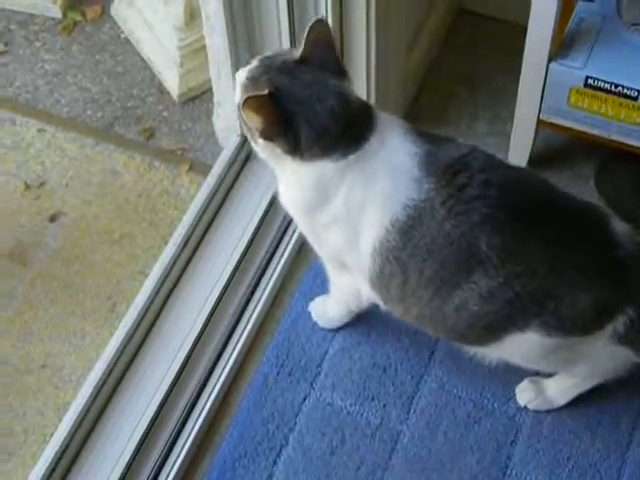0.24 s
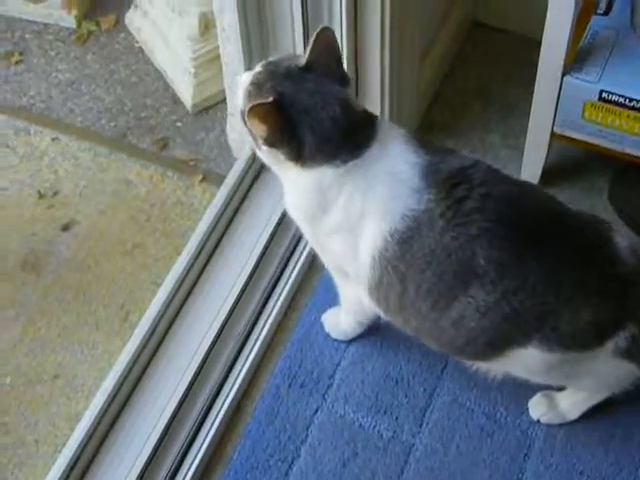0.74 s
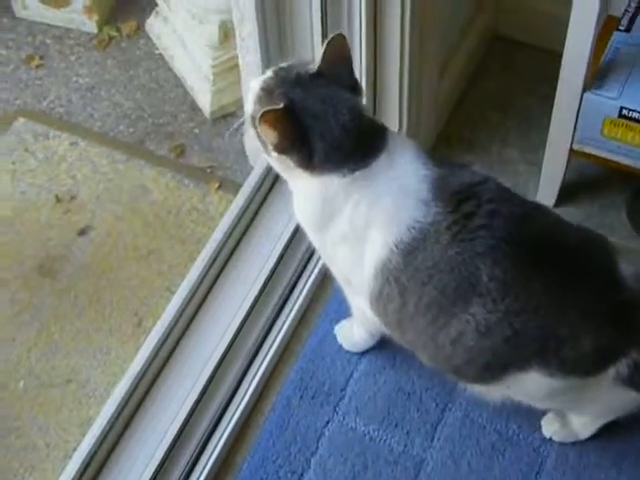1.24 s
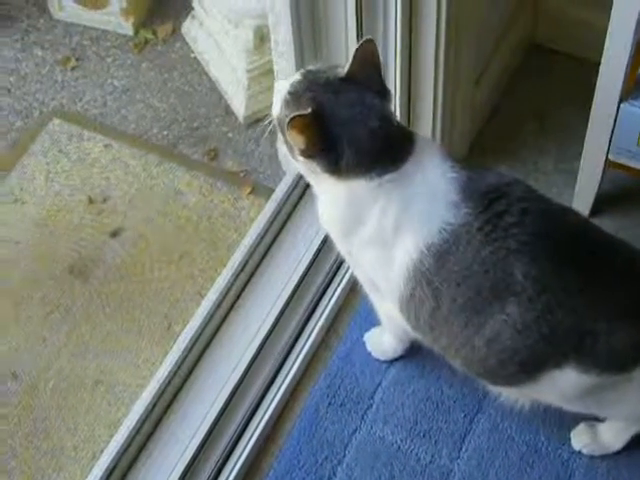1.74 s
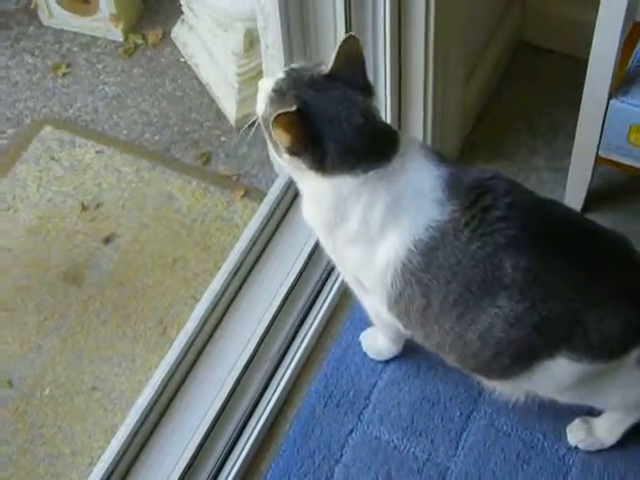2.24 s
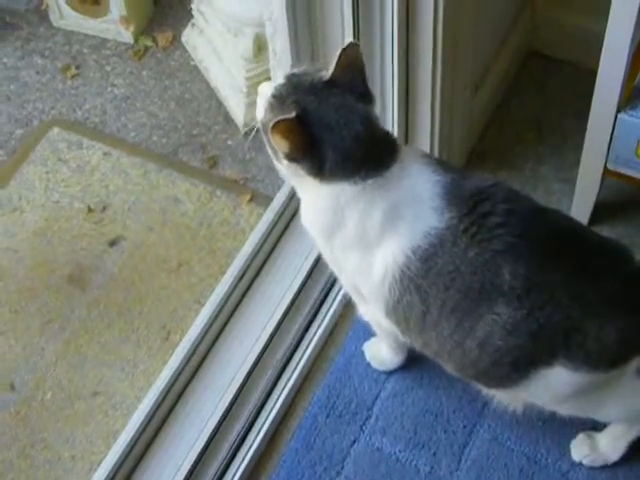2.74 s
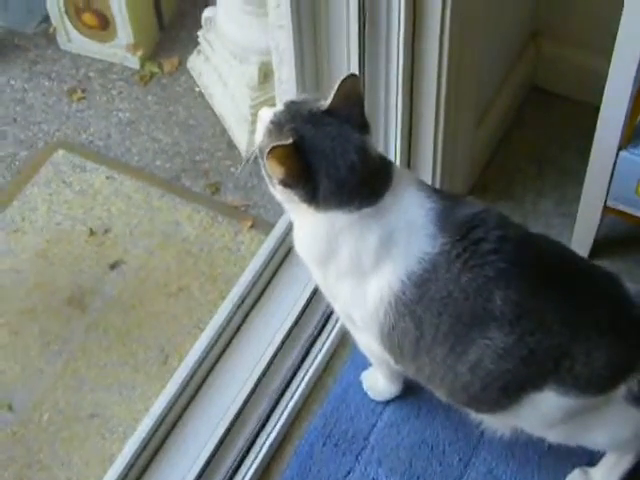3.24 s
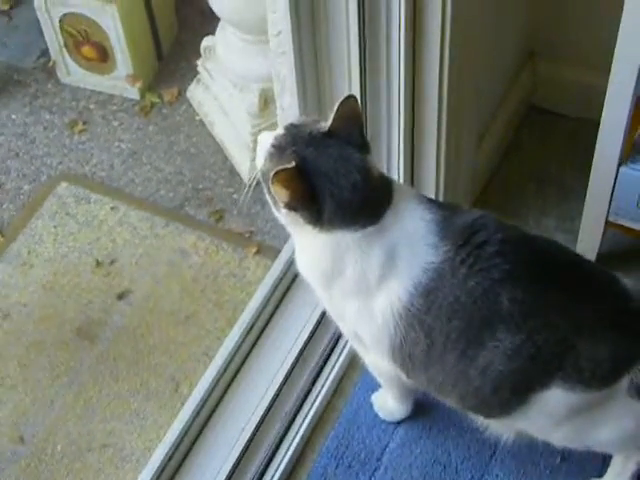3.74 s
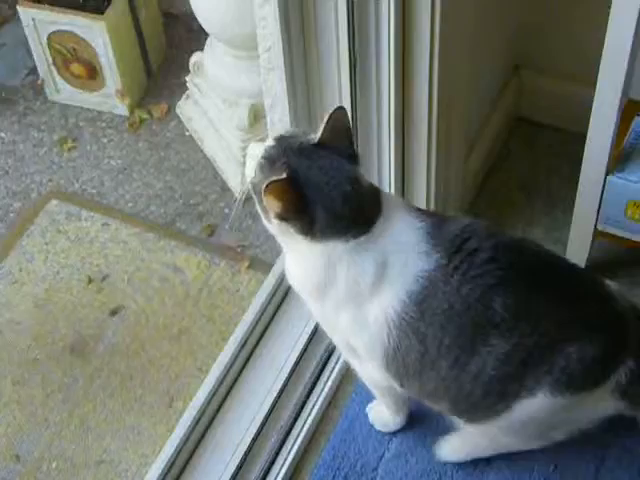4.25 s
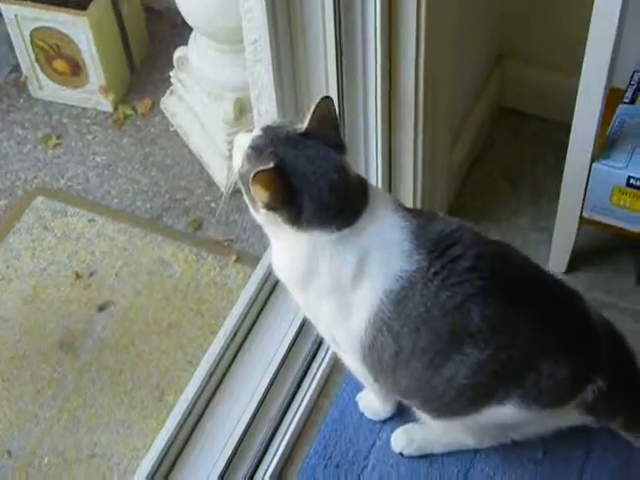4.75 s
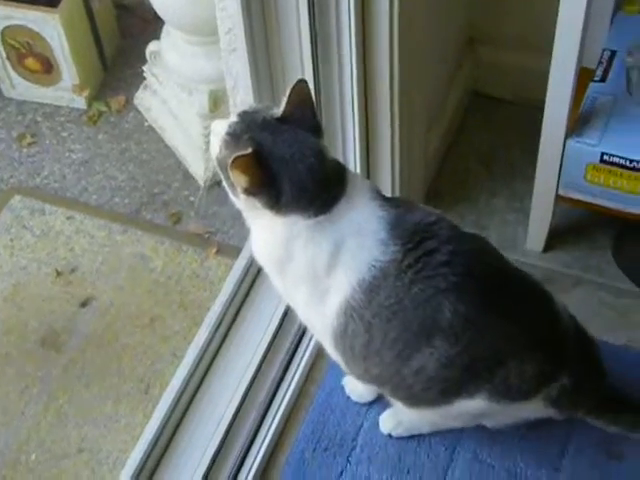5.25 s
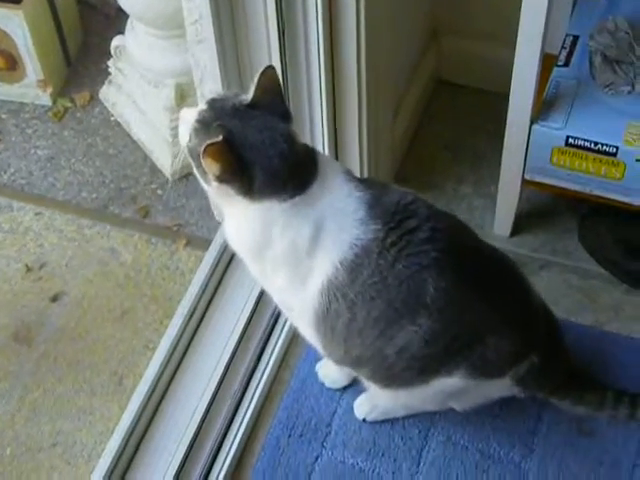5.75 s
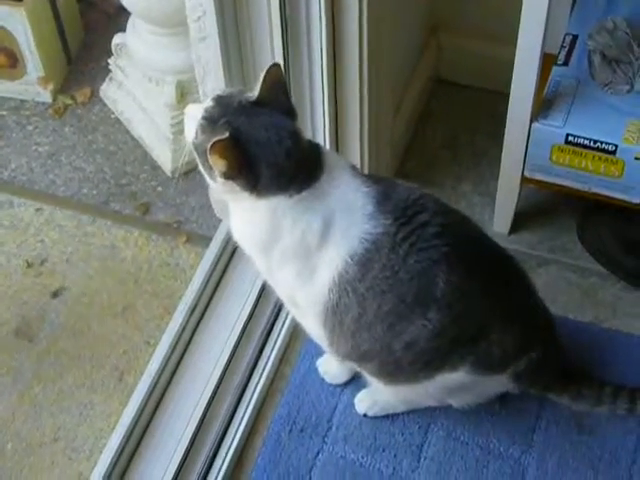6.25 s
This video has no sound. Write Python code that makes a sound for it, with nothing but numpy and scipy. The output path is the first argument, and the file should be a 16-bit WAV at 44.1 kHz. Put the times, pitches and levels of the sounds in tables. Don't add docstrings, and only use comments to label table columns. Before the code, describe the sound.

Light rain patters on leaves and paving while a squirrel scolds in rounds, one rough bark then quick quieter chucks, ending on a sharper bark.

```python
import sys
import numpy as np
from scipy import signal
from scipy.fft import rfft, irfft, next_fast_len
from scipy.io import wavfile
from scipy.ndimage import uniform_filter1d, map_coordinates

SR = 44100
rng = np.random.default_rng(int(sys.argv[2]) if len(sys.argv) > 2 else 0)


def store_wav(level_fs):
    pcm = np.round(np.clip(np.atleast_2d(level_fs), -1, 1) * 32767)
    wavfile.write(sys.argv[1], SR, pcm.T.astype(np.int16))


def to_linear_factor(level_db):
    exponent = np.asarray(level_db, float) / 20
    return 10 ** exponent


N = 287091


def unit(x):
    return x / np.sqrt(np.mean(x ** 2) + 1e-20)


def along(points, hz):
    f, value = np.transpose(points)
    return np.interp(np.log(hz + 1), np.log(f + 1), value)


def wobble(rate, size=N):
    knots = rng.standard_normal(int(size * rate / SR) + 4)
    return map_coordinates(knots, [np.arange(size) * rate / SR])


def filtered(x, response):
    m = next_fast_len(len(x) + 8192)
    return irfft(rfft(x, m) * response(np.fft.rfftfreq(m, 1 / SR)), m)[:len(x)]


def resonance(hz, width_hz, order=2):
    return lambda f: (1j * f * width_hz / (hz * hz - f * f + 1j * f * width_hz)) ** order


def patchy(patchy_db, tall, wide):
    z = signal.stft(rng.standard_normal(N), nperseg=256)[2]
    field = uniform_filter1d(rng.standard_normal(z.shape), int(tall), 0)
    field = uniform_filter1d(field, int(wide), 1)
    return signal.istft(z * to_linear_factor(patchy_db * unit(field)), nperseg=256)[1][:N]


def patter(low_hz, high_hz, cycles, spread_db, count):
    when, pitch, size = rng.random((count, 3)).T
    hz = (low_hz * (high_hz / low_hz) ** pitch)[:, None]
    k = np.arange(256)
    life = k / SR * hz / cycles
    tones = life * np.exp(-life) * np.sin(2 * np.pi * hz * k / SR)
    grains = to_linear_factor(np.minimum(-spread_db * np.log(size), 13))[:, None] * tones
    spots = (when * N).astype(int)[:, None] + k
    return unit(np.bincount(spots.ravel(), grains.ravel(), N + 256)[:N])


# (t/s, level/dB)
SHOWER = [(0.0, -39), (0.49, -39.5), (1.52, -40.5), (2.36, -40.5), (3.19, -40), (3.64, -38.5), (4.1, -38),
          (4.46, -39.5), (5.0, -39.5), (6.18, -42.5), (6.38, -38.5), (6.51, -41)]
# (f/Hz, level/dB)
PAVING_SPECTRUM = [(210, -41), (260, -17.5), (450, -12), (750, -9), (1100, -8.5), (1700, -9), (2400, -6),
                   (3600, -4.5), (5000, -5), (7000, -18.5)]
# (f/Hz, level/dB)
LEAVES_SPECTRUM = [(2500, -25), (4500, -14), (5500, -4), (6300, 0), (7000, -1.5), (7500, -6.5), (9000, -8)]
# (f/Hz, level/dB)
RUMBLE_SPECTRUM = [(20, -3), (60, 1), (80, 1), (100, 2.5), (122, 5.5), (150, -7.5), (200, -38), (300, -1)]


def rain():
    s, db = np.transpose(SHOWER)
    leaves_db = np.interp(np.arange(N) / SR, s, db)
    paving_db = -44.5 + 0.33 * (leaves_db - leaves_db.mean())
    gust_db = 1.5 + 0.5 * wobble(9) + 0.8 * wobble(30)
    paving = patchy(1.8, 7.1, 6.6) + 0.29 * patter(1990, 5840, 3.25, 6.0, count=4000)
    leaves = patchy(0.78, 3.8, 3.3) + 0.36 * patter(4044, 7950, 4.0, 3.8, count=4000)
    paving = unit(filtered(paving, lambda f: to_linear_factor(along(PAVING_SPECTRUM, f))))
    leaves = unit(filtered(leaves, lambda f: to_linear_factor(along(LEAVES_SPECTRUM, f))))
    hush = rng.standard_normal(N)
    rumble = unit(filtered(hush, lambda f: to_linear_factor(along(RUMBLE_SPECTRUM, f) - 60 * (f > 400))))
    wet = to_linear_factor(paving_db + gust_db) * paving + to_linear_factor(leaves_db + gust_db) * leaves
    return wet + to_linear_factor(-74) * rumble


# (t/s, peak level/dB)
MORE_DROPS = [(0.0185, -30), (0.6235, -28), (0.9223, -35), (1.518, -28), (2.2675, -32), (2.4284, -33),
              (2.8024, -29), (2.8978, -29), (3.3702, -31), (3.5029, -32), (3.8147, -28), (3.982, -28),
              (4.5521, -33), (4.5745, -35), (5.165, -30), (5.4999, -31), (5.663, -34)]


def more_drops():
    pitch_hz, spread = 6450, 0.045
    scatter = 1 + spread * rng.standard_normal(len(MORE_DROPS))
    return [(s, db, pitch_hz * k) for (s, db), k in zip(MORE_DROPS, scatter)]


# (t/s, peak level/dB, ring f/Hz)
NEAR_DROPS = [(0.1341, -25, 4150), (0.156, -27, 6360), (0.206, -22, 6850), (0.272, -26, 6350),
              (0.4584, -28, 6230), (0.9712, -24.5, 6600), (1.018, -26, 6300), (1.2403, -21, 4400),
              (1.3174, -25.5, 5750), (1.4013, -26.5, 6320), (1.4955, -26, 6500), (1.611, -25.5, 7000),
              (1.732, -28, 6400), (2.5812, -24, 6600), (2.867, -26, 6300), (2.958, -20.5, 6300),
              (2.9975, -23, 6100), (3.19, -27, 6140), (3.42, -23, 5200), (4.014, -28, 6900),
              (4.4078, -21, 5950), (4.4386, -28, 5960), (4.4804, -31, 3080), (4.4974, -26, 6900),
              (4.592, -25, 6500), (4.7094, -28, 6510), (4.8205, -21.5, 6430), (5.0833, -26, 6910),
              (5.5856, -28, 6600), (5.925, -26.5, 6500)]


def drops():
    out, t = np.zeros(N + SR), np.arange(SR // 16) / SR
    onset = 1 - np.exp(-t / 0.0012)
    decay = to_linear_factor(-60 * t / 0.016) + 0.16 * to_linear_factor(-60 * t / 0.07)
    for s, db, hz in NEAR_DROPS + more_drops():
        splash = rng.standard_normal(len(t)) * onset * decay
        tick = filtered(splash, lambda f: resonance(hz, 0.25 * hz)(f) + 0.079 * resonance(hz, 2.5 * hz)(f))
        out[round(s * SR):][:len(t)] += to_linear_factor(db) * tick / np.abs(tick).max()
    return out[:N]


# (t/s, peak level/dB, ring f/Hz)
PUDDLE_DRIPS = [(0.1092, -32, 3000), (0.1356, -37, 4150), (1.6347, -24, 3240), (1.7095, -32, 2170),
                (2.769, -22, 2450), (2.785, -22, 2190), (2.8194, -37, 3060), (3.043, -30, 3060),
                (3.2875, -24, 3110), (3.7564, -23, 4190), (4.6244, -28, 3430), (4.6828, -29, 3600),
                (5.1477, -27, 3920), (5.549, -25, 2480),
                (0.135, -21.5, 2450),
    (0.184, -32, 1130),
    (1.781, -31, 843),
    (3.847, -32, 2540),
    (3.885, -28, 2870),
]


def plinks():
    out, t = np.zeros(N + SR), np.arange(SR // 16) / SR
    for s, db, hz in PUDDLE_DRIPS:
        pitch_hz = hz * (1.03 - 5 * t + 0.025 * wobble(390, len(t)))
        phase = 2 * np.pi * np.cumsum(pitch_hz) / SR
        swell = (1 - np.exp(-t / 0.002)) * to_linear_factor(-60 * t / 0.035 + 2.5 * wobble(300, len(t)))
        out[round(s * SR):][:len(t)] += to_linear_factor(db - 5.5) * swell * np.sin(phase)
    return out[:N]


def steadied(x, seconds):
    power = np.abs(uniform_filter1d(unit(x) ** 2, int(seconds * SR)))
    return unit(x / np.sqrt(power + 0.12))


# (plain chuck level/dB, slope on effort/(dB/dB), slope on tension/(dB/dB))
LOUDNESS_LAW = [
    (-49.5, .32, -0.23),
    (-44, .45, .7),
    (-38, .87, -.15),
    (-40, 1.03, 1.05),
]
# (rest level/dB, share of the attack/1, sag/(dB/s))
ENVELOPE = [
    (-55, 1.3, 5),
    (-54, .5, 110),
    (-52, .95, 330),
    (-54, .95, 230),
]
NARROW_PER_DB = 0.05


def breath_db(t, length, effort_db, tension_db):
    over_db = effort_db + 40
    attack = np.clip(0.013 + 0.0021 * over_db, 0.004, 0.45 * length)
    release = np.clip((t - length) / 0.015 + 1, 0, 1)
    hold = np.exp(-0.07 * tension_db)
    levels = []
    for (base_db, by_effort, by_tension), (rest_db, share, sag) in zip(LOUDNESS_LAW, ENVELOPE):
        peak_db = base_db + by_effort * over_db + by_tension * tension_db
        top = share * attack
        held_db = peak_db - (peak_db - rest_db) * np.clip(1 - t / top, 0, 1) ** 1.7
        held_db -= sag * hold * np.maximum(t - top, 0)
        levels.append(held_db + release * (np.minimum(rest_db, held_db) - held_db))
    return levels


# (start t/s, length t/s, effort level/dB, jaw tension level/dB)
CALLS = [(0.357, 0.086, -28, -2), (.536, .059, -38.5, -3), (.684, .061, -40, -2.5),
         (.842, 0.065, -40.5, -5.5), (1.052, 0.061, -40.5, -2), (2.024, .095, -30, -1),
         (2.19, 0.053, -42, -1.5), (2.342, 0.055, -40, -3), (2.497, 0.05, -41.5, -5),
         (2.656, .052, -40.5, -0.5), (3.591, .101, -26, -2), (3.772, 0.057, -42, -4),
         (3.922, .056, -43, -3), (4.148, 0.071, -41.5, -1), (4.344, .058, -41, -4), (6.328, 0.11, -26, 6)]
# (mouth open f/Hz, mouth closed f/Hz, width f/Hz)
VOCAL_TRACT = [
    (820, 660, 480),
    (1520, 1380, 380),
    (3680, 3330, 1150),
    (7080, 6620, 850),
]


def squirrel():
    out = np.zeros(N)
    for s, length, effort_db, tension_db in CALLS:
        start, size = round(s * SR), round(length * SR)
        call = slice(start, start + size)
        levels = breath_db(np.arange(size) / SR, length, effort_db, tension_db)
        cycles = np.cumsum(240 * to_linear_factor(1.86 * wobble(98.8, size))) / SR
        puffs = to_linear_factor(2 * wobble(200, size)) * (0.5 + np.cos(np.pi * cycles) ** 4)
        closing = np.linspace(0, np.pi / 2, size)
        fade = signal.windows.tukey(size, 0.2)
        for (open_hz, closed_hz, width_hz), db in zip(VOCAL_TRACT, levels):
            width_hz = width_hz * np.exp(-NARROW_PER_DB * tension_db)
            air = puffs * rng.standard_normal(size)
            ring = np.cos(closing) * filtered(air, resonance(open_hz, width_hz, order=3))
            ring += np.sin(closing) * filtered(air, resonance(closed_hz, width_hz, order=3))
            out[call] += fade * to_linear_factor(db) * steadied(ring, 0.0103)
        cavity = filtered(puffs * rng.standard_normal(size), resonance(5400, 1000))
        out[call] += fade * to_linear_factor(levels[-1] - 11) * unit(cavity)
    step_s, step_db = 0.0039, -13.5
    return filtered(out, lambda f: 1 + to_linear_factor(step_db) * np.exp(-2j * np.pi * f * step_s))


# (f/Hz, t60 t/s)
PORCH_DECAY = [(300, 0.31), (2000, 0.25), (7000, 0.091)]


def porch(x):
    hz, t, z = signal.stft(rng.standard_normal(SR // 2), SR, nperseg=256)
    decay = to_linear_factor(-60 * t / along(PORCH_DECAY, hz)[:, None])
    tail = signal.istft(z * decay, SR, nperseg=256)[1]
    delayed = np.pad(x, (300, 0))
    return signal.fftconvolve(delayed, tail / np.linalg.norm(tail))[:N]


def scene():
    voice = squirrel()
    mix = voice + to_linear_factor(-12.5) * porch(voice) + rain() + drops() + plinks()
    return np.tile(mix, (2, 1))


SPLIT_HZ = 7860
# (f/Hz, level/dB)
FILL_SPECTRUM = [(7800, -30), (8100, -6.5), (8600, -1.5), (9500, -6), (10500, -9), (13000, -12),
                 (15700, -15.5)]
# (f/Hz, level/dB)
MIRROR_SPECTRUM = [(7900, -11), (8600, 5), (10000, -8), (12000, 0), (15700, -18)]


def top_octave(low):
    above = lambda f: (f > SPLIT_HZ) * (f < 2 * SPLIT_HZ - 100)
    treble_power = uniform_filter1d(filtered(low, lambda f: f > 2500) ** 2, 90)
    follow = np.abs(treble_power) ** 0.26
    fill = filtered(follow * patchy(2.8, 13, 2), lambda f: to_linear_factor(along(FILL_SPECTRUM, f)) * above(f))
    clock = filtered(rng.standard_normal(N), resonance(2 * SPLIT_HZ, 280))
    image = filtered(low * clock, lambda f: to_linear_factor(along(MIRROR_SPECTRUM, f)) * above(f))
    coarse = np.abs(uniform_filter1d(low ** 2, 60)) ** 0.93
    grit = filtered(coarse * rng.standard_normal(N), above)
    return to_linear_factor(-45) * unit(fill) + to_linear_factor(-55.5) * unit(image) + to_linear_factor(-60) * unit(grit)


def top_cut(x):
    return signal.sosfilt(signal.butter(12, 15720, fs=SR, output="sos"), x)


def record(dry):
    low = filtered(dry[0], lambda f: np.clip((SPLIT_HZ - f) / 400, 0, 1))
    mix = np.tile(low + top_octave(low), (2, 1))
    return top_cut(mix)


dry = scene()
out = record(dry)
store_wav(out)
```